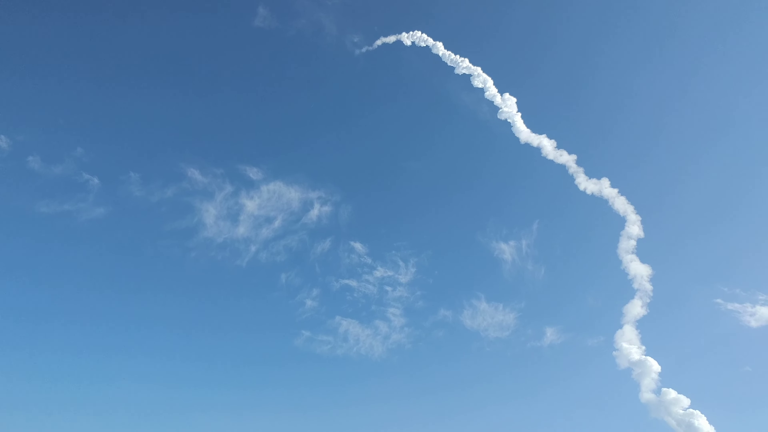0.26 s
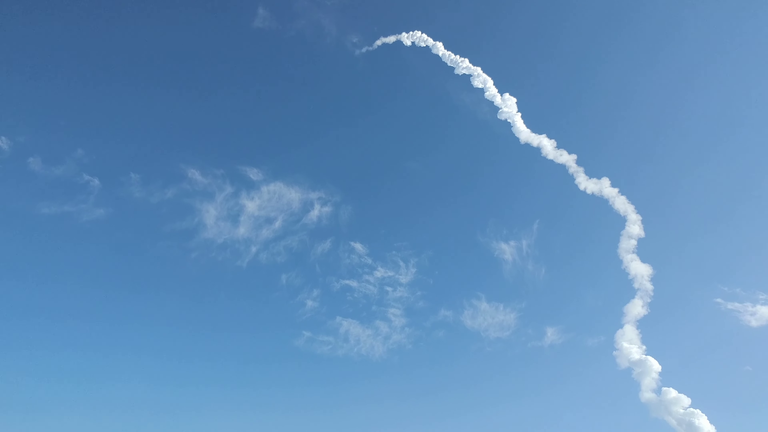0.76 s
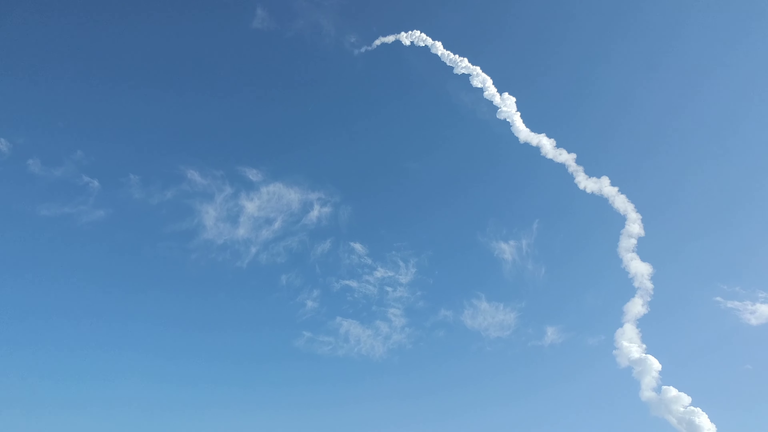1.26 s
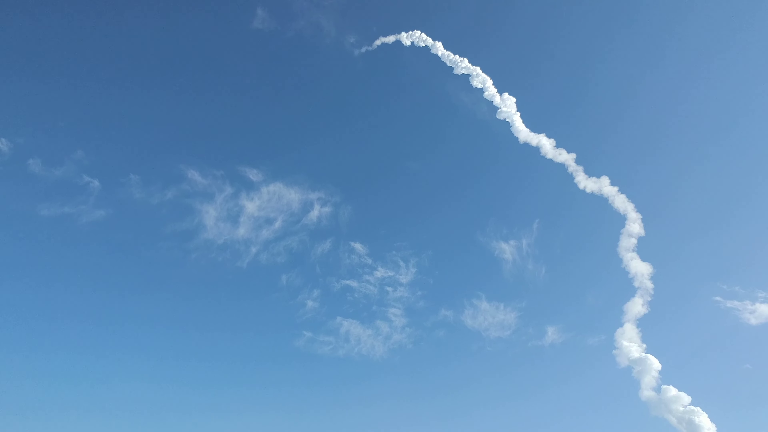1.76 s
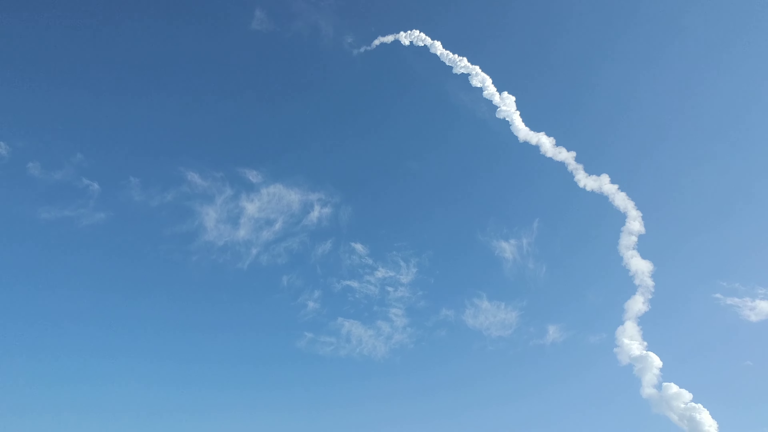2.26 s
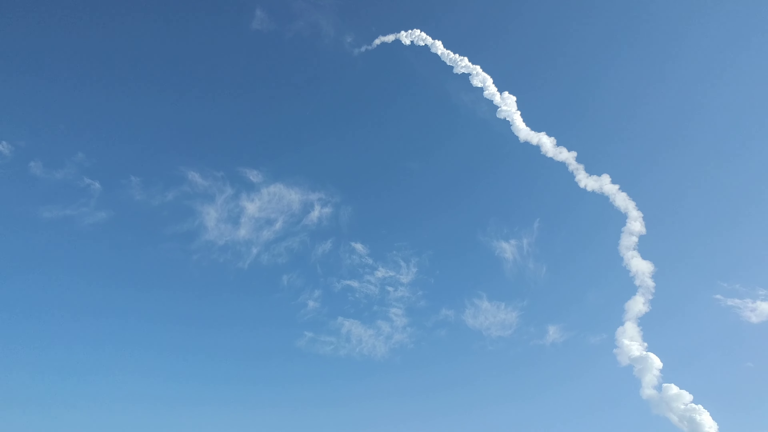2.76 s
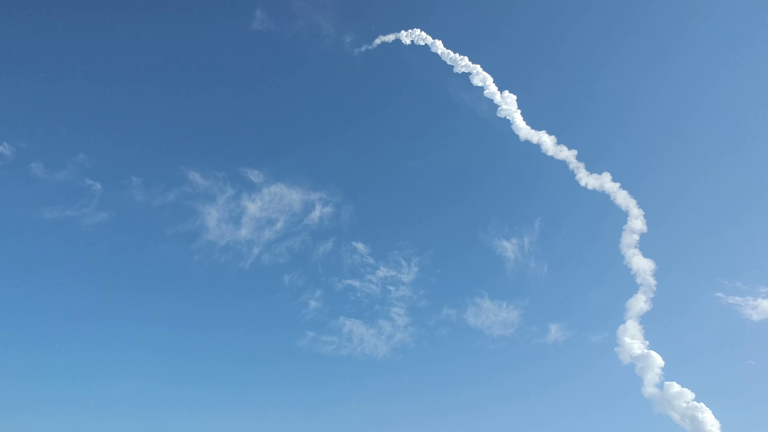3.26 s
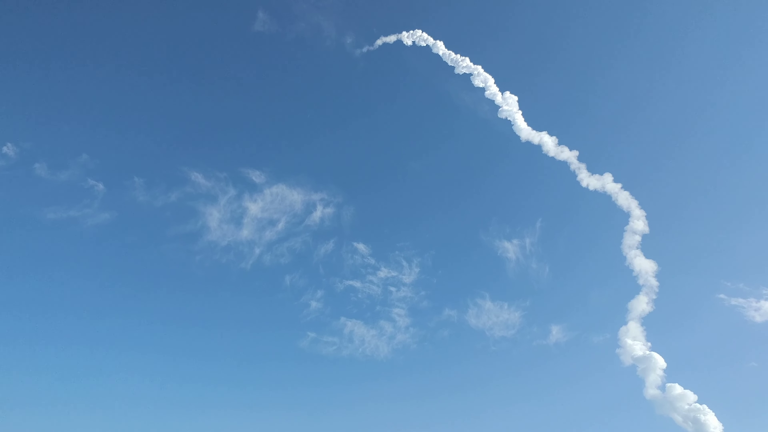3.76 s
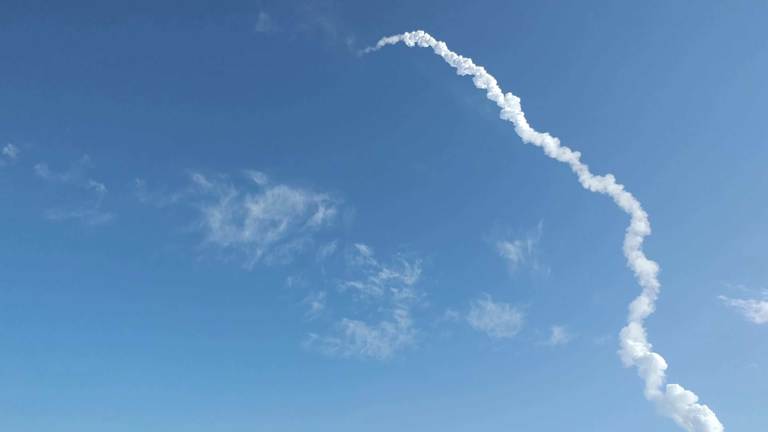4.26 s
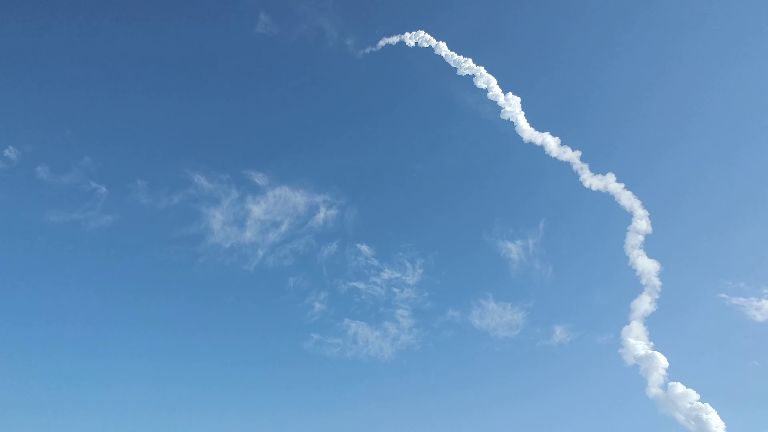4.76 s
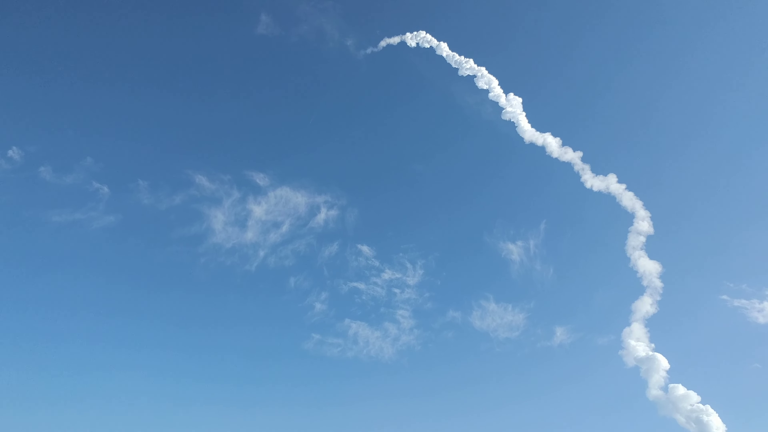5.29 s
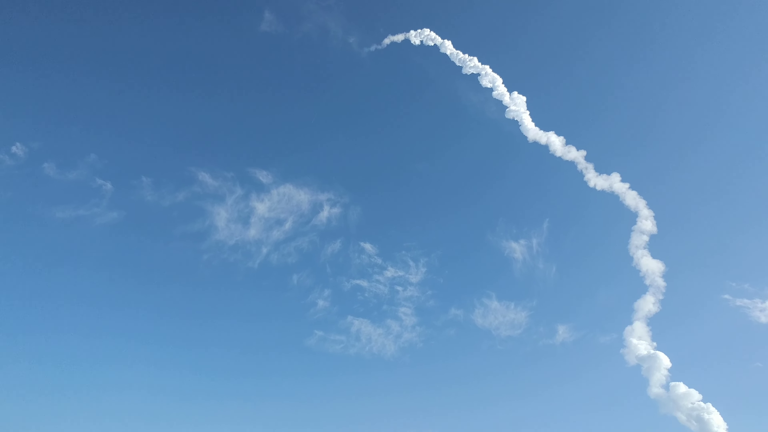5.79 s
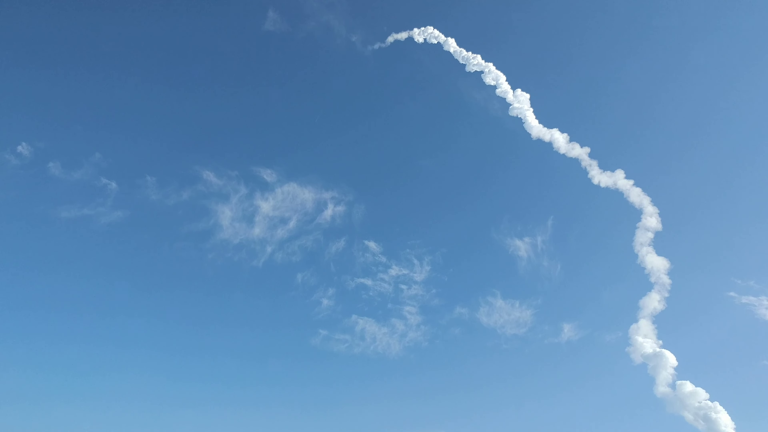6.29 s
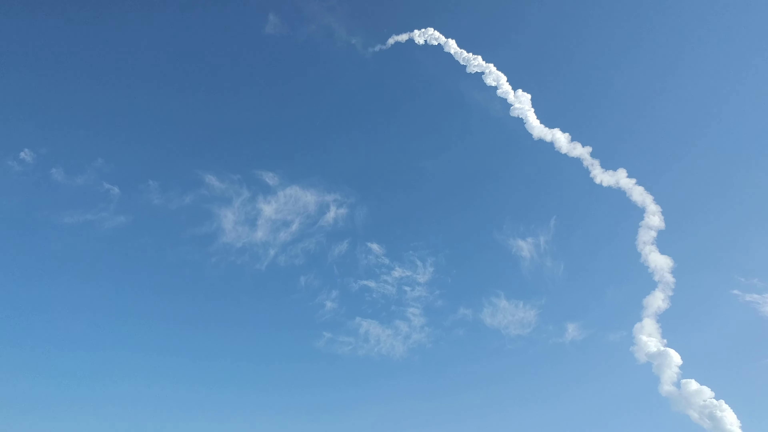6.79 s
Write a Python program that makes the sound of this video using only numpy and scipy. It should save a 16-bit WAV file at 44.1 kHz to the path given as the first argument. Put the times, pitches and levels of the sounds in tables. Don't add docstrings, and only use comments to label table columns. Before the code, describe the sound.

On an open beach, wind buffets a small handheld stereo microphone: deep thumps, fluttering rumble and hard hollow pops, different at left and right. The first three seconds are densest, then it eases around four seconds before fresh gusts return. Far behind, a rocket gives a steady, dull low roar, and faint surf hiss swells softly.

```python
import sys
import numpy as np
from scipy import signal
from scipy.fft import rfft, irfft, next_fast_len
from scipy.io import wavfile
from scipy.ndimage import uniform_filter1d, minimum_filter1d

SR = 44100
rng = np.random.default_rng(int(sys.argv[2]) if len(sys.argv) > 2 else 0)


def volts(x):
    e = np.asarray(x, float) / 20
    return 10 ** e


def to_wav(s):
    ch = np.atleast_2d(s).T
    pcm = np.round(np.clip(ch, -1, 1) * 32767)
    wavfile.write(sys.argv[1], SR, pcm.astype(np.int16))


N = 310464
SIZE = next_fast_len(N)
HZ = np.maximum(np.arange(SIZE // 2 + 1) * SR / SIZE, 1)
TIME = np.arange(N) / SR
TAKE_OVER = 0.76


def at_hz(points):
    hz, value = np.transpose(points)
    return np.interp(np.log(HZ), np.log(hz), value)


def in_time(rows):
    s, *columns = np.transpose(rows)
    return [np.interp(TIME, s, column) for column in columns]


def around(s, reach):
    centre = round(s * SR)
    return np.arange(max(centre - reach, 0), min(centre + reach, N))


def below(hz):
    return 1 / np.sqrt(1 + (HZ / hz) ** 8)


def coloured(spectrum, gain):
    sound = irfft(spectrum * gain, SIZE)[..., :N]
    return sound / np.sqrt(np.mean(sound ** 2, axis=-1, keepdims=True))


def white(lumps_db=0):
    return rfft(rng.standard_normal(N) * volts(lumps_db), SIZE)


def drift(rate_hz):
    return coloured(white(), 1 / (1 + (HZ / rate_hz) ** 2))


def late(ms):
    return np.exp(-2j * np.pi * HZ * np.array([[0], [ms / 1000]]))


def patches(sound, depth_db):
    spectrum = rfft(sound, SIZE)
    place = 3 * np.log2(np.clip(HZ, 1200, 12000) / 1200)
    out = np.zeros_like(sound)
    for k in range(11):
        wander = np.array([drift(rate_hz=1.2), drift(rate_hz=2.0)])
        patch = irfft(spectrum * np.clip(1 - abs(place - k), 0, 1), SIZE)[:, :N]
        out += volts(depth_db * (1 - k / 10) * wander) * patch
    return out


def surf():
    # (time [s], level [dB], lean to the left [dB], coarse spray over the foam [dB])
    near_foam = [(0, -41, 1, 2), (0.4, -43, -3, 1.5), (0.8, -42, 1.5, 5.5), (1.2, -42.5, -1.5, 5.5),
                 (1.5, -40.5, 0.5, 4), (1.81, -37.5, 0.5, 3.5), (2.0, -39.5, -3.5, 3.5), (2.2, -40.5, 4, 3),
                 (2.82, -41.5, 1, 4), (3.05, -39.5, 2.5, 1.5), (3.22, -36, -2, 0.5),
                 (3.6, -37.5, -0.5, 0.5), (4.2, -37, 0.5, 2), (4.83, -35.5, -0.5, -3),
                 (5.3, -37, 0.5, -0.5), (5.7, -39, -0.5, 0), (6.2, -37.5, -1, 0), (7.04, -40, 0, 2.5)]
    # (time [s], level [dB])
    far_wash = [(0, -36), (0.25, -35.8), (0.75, -35.5), (1.25, -36.5), (1.75, -37.5), (2.25, -41),
                (2.85, -41), (3.25, -38), (3.9, -39.5), (4.55, -41), (4.9, -37.5), (5.65, -40.5),
                (5.95, -38.5), (6.35, -38), (6.8, -38.5), (7.04, -37)]
    # (frequency [Hz], likeness [0-1])
    likeness = [(1200, 0.77), (1450, 0.22), (1750, 0.07), (2000, 0.14), (2400, 0.6), (2700, 0.3),
                (3500, 0.02), (3900, 0.77), (5200, 0.01), (6000, 0.12), (7000, 0.12), (9000, 0.01)]
    # (frequency [Hz], level [dB per Hz])
    left_colour = [(1300, -29), (2200, -34), (3000, -40.5), (5000, -39), (7500, -40.5), (8400, -42),
                   (8900, -63), (9200, -46.5), (9800, -37.5), (10500, -31.5), (11300, -35), (12300, -40),
                   (14900, -35), (15200, -68.8)]
    right_colour = [(1300, -24.5), (2200, -31.5), (3000, -38), (4500, -37), (5800, -35.5), (6700, -29.5),
                    (7300, -32), (8000, -41), (8700, -47), (9100, -89.2), (9800, -54), (10500, -51),
                    (12400, -72), (13000, -106)]

    foam_db, lean_db, spray_db = in_time(near_foam)
    wash_db = in_time(far_wash)[0]
    hiss_db = np.array([foam_db + lean_db / 2, foam_db - lean_db / 2])
    alike = np.clip(at_hz(likeness), 0, 1)
    foam = np.array([white(1.2 * drift(rate_hz=7.1)), white(1.0 * drift(rate_hz=18))])
    breaker = white(0.47 * drift(rate_hz=7.2)) * late(ms=0.424)
    waves = np.sqrt(alike) * breaker + np.sqrt(1 - alike) * foam
    waves = waves * volts(np.array([at_hz(left_colour), at_hz(right_colour)])) * below(12640) ** 2

    low = below(2880)
    wash = coloured(waves, low * np.sqrt(1 - below(1140) ** 2))
    hiss = coloured(waves, np.sqrt(1 - low ** 2))
    spray = irfft(rfft(hiss, SIZE) * below(4940), SIZE)[:, :N]
    hiss = hiss + (volts(spray_db) - 1) * spray
    return patches(volts(wash_db - 0.86) * wash + volts(hiss_db - 1.52) * hiss, depth_db=1.6)


def roar():
    # (frequency [Hz], level [dB per Hz])
    roar_colour = [(150, -11), (300, -11), (540, -13), (700, -12.5), (850, -13), (1000, -19.5),
                   (1200, -30.5), (1400, -34.5)]
    source = white(0.8 * drift(rate_hz=6) + 2.0 * drift(rate_hz=80))
    gain = volts(at_hz(roar_colour)) * (1 - below(99)) * below(1900) ** 3
    return volts(-25) * coloured(source * late(ms=0.28), gain)


def puffs(table):
    return sum(over_db * np.exp(-((TIME - s) / half_s) ** 2) for s, over_db, half_s in table)


def gusts():
    # (time [s], strength [dB], lean to the left port [dB])
    wind_course = [(0.0, -10.5, 0.5), (0.59, -12, 2), (1.17, -12.5, 3.5), (1.76, -12.5, -5),
                   (2.35, -14.5, -2), (2.93, -13.5, -5), (3.52, -16.5, -2), (4.11, -16.5, -1.8),
                   (4.69, -14.5, 3), (5.28, -13, -1.5), (5.87, -13.5, -1.5), (6.45, -15, -1.1),
                   (7.04, -11.5, 7.5)]
    # (time [s], level over the wind [dB], half-length [s])
    left_gusts = [(0.06, 3, 0.052), (0.2, -4, 0.057), (0.37, -4, 0.028), (0.47, 5.5, 0.035),
                  (0.585, -8.5, 0.072), (0.737, 2.5, 0.14), (0.95, 2.5, 0.14), (1.166, -5, 0.042),
                  (1.35, -1, 0.075), (1.476, 2, 0.028), (1.75, 3.5, 0.036), (2.066, 3.5, 0.034),
                  (2.265, -3.5, 0.056), (2.55, 2, 0.05), (2.93, 3.5, 0.08), (3.132, -2.5, 0.057),
                  (3.279, -5, 0.02), (3.399, 2.5, 0.047), (3.866, -5.5, 0.11), (4.25, 0.5, 0.05),
                  (4.415, -5, 0.078), (4.531, -1, 0.055), (4.9, 0.5, 0.067), (5.401, 8, 0.067),
                  (5.62, -2, 0.06), (5.9, 0, 0.079), (6.05, 0, 0.019), (6.376, -5.5, 0.051),
                  (6.837, -3.5, 0.06), (6.92, -2, 0.03)]
    right_gusts = [(0.147, -10, 0.05), (0.261, 8, 0.068), (0.372, 4, 0.03), (0.612, 4, 0.05),
                   (0.73, -3, 0.046), (1.002, -1, 0.086), (1.186, 3.5, 0.067), (1.274, 3.5, 0.059),
                   (1.707, -7, 0.094), (1.932, 4.7, 0.041), (2.542, -5, 0.085), (2.739, 0, 0.099),
                   (3.007, 2.5, 0.036), (3.211, -3.5, 0.17), (3.372, 1, 0.041), (3.456, 0.5, 0.048),
                   (3.9, -7, 0.036), (4.048, -14, 0.041), (4.501, 2, 0.034), (4.608, 2.5, 0.058),
                   (5.027, -2.5, 0.17), (5.222, 2, 0.07), (5.707, -2.5, 0.049), (5.828, 5, 0.044),
                   (6.431, 0, 0.059), (6.649, 3.5, 0.045), (6.78, -7, 0.06)]

    wind_db, lean_db = in_time(wind_course)
    port_db = wind_db + np.array([lean_db / 2 + puffs(left_gusts), puffs(right_gusts) - lean_db / 2])
    swing_db = port_db - port_db.mean(axis=1, keepdims=True)
    flutter_db = np.array([-17.5 + 0 * TIME, -38 + 3 * TIME])
    return port_db - 5, flutter_db + 0.86 * swing_db


def build_up(table):
    bursts = np.zeros(SIZE)
    s, peak_db = np.transpose(table)[:2]
    bursts[(s * SR).astype(int)] = volts(np.minimum(peak_db, 1))
    lag = np.fft.fftfreq(SIZE, 1 / SIZE) / SR
    shape = np.where(lag < 0, np.exp(lag / 0.0016), np.exp(-lag / 0.0048))
    shape = shape + 0.54 * np.exp(-(lag / 0.021) ** 2)
    return 1 + 1.8 * irfft(rfft(bursts) * rfft(shape), SIZE)[:N]


def calm(table):
    share = np.ones(N)
    for s, *_ in table:
        i = around(s, reach=600)
        share[i] *= 1 - TAKE_OVER * np.exp(-((TIME[i] - s) / 0.0018) ** 2)
    return share


def eddies(table, cycles):
    out, share = np.zeros(N), np.ones(N)
    turns = rng.uniform(0, 2 * np.pi, len(table))
    for (s, peak_db, hz), turn in zip(table, turns):
        i = around(s, reach=1500)
        t = i / SR - s
        bell = np.exp(-(t * hz / cycles) ** 2)
        out[i] += volts(peak_db) * bell * np.cos(2 * np.pi * hz * t + turn)
        share[i] *= 1 - TAKE_OVER * np.sqrt(bell)
    return out, share


def wind(colour, thud_db, flutter_db, swell, thumps, crackle):
    lumps = drift(rate_hz=9.4)
    thud_lumps_db = np.minimum(1.05 * lumps + 0.96 * drift(rate_hz=57), 1.5)
    flutter_lumps_db = np.minimum(0.9 * lumps + 1.9 * drift(rate_hz=64), 1.5)
    low = below(226)
    gain = volts(at_hz(colour)) * below(1770) ** 3
    thud = coloured(white(thud_lumps_db), gain * low)
    flutter = coloured(white(flutter_lumps_db), gain * np.sqrt(1 - low ** 2))

    thump, thud_left = eddies(thumps, cycles=0.62)
    crack, flutter_left = eddies(crackle, cycles=0.77)
    steady = volts(thud_db + 1.43) * np.sqrt(swell) * thud * thud_left
    steady += volts(flutter_db - 6.5) * swell * flutter * flutter_left
    return steady, volts(-1.6) * thump + volts(-0.74) * crack


def pops(table):
    out = np.zeros(N)
    turns = rng.uniform(0, 2 * np.pi, (len(table), 2))
    for (s, peak_db, hz, push_db), (turn, push_turn) in zip(table, turns):
        i = around(s, reach=600)
        t = i / SR - s
        ring = np.exp(-(t * hz / 0.72) ** 2) * np.cos(2 * np.pi * hz * t + turn)
        push = np.exp(-(t / 0.0024) ** 2) * np.cos(2 * np.pi * 230 * t + push_turn)
        front = np.exp(-(t / 0.00086) ** 2) * np.cos(3.8 * np.pi * hz * t + push_turn)
        ring += 0.16 * (hz / 600) ** 2 * front
        out[i] += volts(min(peak_db + 2.1, -1)) * ring + volts(push_db + 2.5) * push
    return out


def ducking(overloads):
    drops = [np.where(TIME > s, drop_db - 72 * (TIME - s), 0) for s, drop_db in overloads]
    drop = np.max(drops, axis=0).clip(0)
    return volts(-uniform_filter1d(uniform_filter1d(drop, size=100), size=100))


def left_port(thud_db, flutter_db):
    # (frequency [Hz], level [dB per Hz])
    wind_colour = [(22, -21), (35, -18), (50, 4.5), (65, -4.5), (90, 3.5), (130, -2.5), (200, -2),
                   (300, -2.5), (420, -9), (540, -1.5), (700, -17.5), (850, -15.5), (1000, -21.5),
                   (1250, -33.5)]
    # (time [s], peak [dB], cavity pitch [Hz], push [dB])
    pop_table = [(0.1217, -9, 586, -15), (0.1704, -9, 480, -7), (0.3439, 2, 550, -14),
                 (0.3686, -5, 574, -8), (0.3764, 6, 650, -8), (0.3996, 9, 650, -12), (0.4604, -3, 543, -13),
                 (0.4753, -10, 497, -11), (0.7751, -11, 530, -7), (1.1468, 2, 610, -8),
                 (1.1889, -5, 480, -14), (1.2307, -1, 540, -3), (1.4639, -2, 710, -13),
                 (1.6677, 3, 615, -13), (1.813, -6.5, 556, -13), (1.9297, -6.5, 463, -8),
                 (1.9568, -6.5, 700, -7.5), (2.0481, -11, 527, -7), (2.1203, -1, 550, -7),
                 (2.3365, 0, 560, -16), (2.5495, -5, 530, -12), (2.8435, -5.5, 540, -15),
                 (2.9662, -5.5, 590, -23), (4.2922, -4, 497, -16), (4.5944, 6, 457, -19),
                 (5.4225, -5, 730, -12), (5.5509, -7, 600, -29), (5.6669, 5, 555, -15),
                 (6.8317, 1, 550, -25), (6.8592, -8, 500, -5), (0.372, -8, 790, -14),
                 (2.069, -12, 684, -10), (2.11, -8, 720, -19)]
    # (time [s], peak [dB], pitch [Hz])
    thump_table = [(0.024, -3, 140), (0.047, -6.1, 140), (0.076, -4.9, 160), (0.128, -5, 140),
                   (0.18, -5, 90), (0.245, -2, 120), (0.338, -2, 160), (0.371, -7, 150), (0.401, -11, 130),
                   (0.463, -9, 142), (0.487, -3, 90), (0.54, -5, 110), (0.65, 0, 130), (0.679, -8, 100),
                   (0.716, -1, 109), (0.743, -4, 131), (0.763, -5, 170), (0.806, -2, 130),
                   (0.826, -6.7, 130), (0.883, -9, 120), (0.911, -8, 110), (0.965, -13, 100),
                   (1.036, -6.3, 100), (1.068, -6.5, 110), (1.132, -5, 120), (1.229, -9, 139),
                   (1.271, -6.9, 90), (1.328, -8, 89.5), (1.374, -5, 150), (1.464, -3, 90),
                   (1.482, -2.5, 110), (1.569, -4, 100), (1.717, -5.6, 110), (1.908, -0.5, 174),
                   (2.061, 0, 111), (2.116, -10, 122), (2.548, -6, 120), (2.947, -3.5, 150),
                   (4.531, -3.5, 111), (4.804, -7.7, 130), (5.311, -11, 129), (5.414, -1.8, 109),
                   (5.671, -10, 150), (6.051, -0.5, 140), (6.635, -5, 170), (6.761, -4, 120),
                   (6.798, -3, 121), (6.833, -2, 109), (6.862, -5.1, 150), (7.02, -10, 111)]
    # (time [s], peak [dB], cavity pitch [Hz])
    crackle_table = [(0.065, -1, 480), (0.111, -6, 666), (0.247, 5, 473), (0.333, -9, 460),
                     (0.352, -13, 510), (0.384, 6, 470), (0.391, -9, 448), (0.489, -11, 560),
                     (0.55, -6.5, 470), (0.665, -10, 570), (0.712, -3.5, 497), (0.815, -4.5, 457),
                     (0.852, -12, 510), (0.858, -6.9, 480), (0.9, -8, 580), (1.008, -2, 526),
                     (1.065, -4.5, 520), (1.128, -7.5, 656), (1.214, -4, 550), (1.249, -4, 527),
                     (1.342, -3.5, 600), (1.421, -4, 490), (1.455, -4, 560), (1.479, -3.5, 580),
                     (1.506, -5, 516), (1.675, -0.5, 530), (1.742, -4, 450), (1.763, -6, 610),
                     (1.823, -3, 573), (1.862, -6.7, 560), (1.963, -3.5, 554), (2.041, -2, 514),
                     (2.718, -6.5, 670), (2.879, -4, 540), (2.909, -4.4, 566), (2.943, -5, 493),
                     (2.98, -12, 510), (3.022, -5.5, 540), (3.057, -4, 580), (3.405, -5.5, 480),
                     (4.222, -5.7, 630), (4.234, -5.6, 625), (4.739, -5.5, 490), (4.944, -5, 500),
                     (5.093, -8, 550), (5.353, -5, 556), (5.402, -13, 530), (5.409, -3.5, 510),
                     (5.523, -4.9, 526), (5.567, -1, 533), (5.573, -3, 580), (5.629, -4.5, 440),
                     (5.946, -7, 590), (5.955, -7, 560), (6.667, -5, 570), (6.978, -4, 480),
                     (6.996, -3, 580), (7.032, -1.5, 560)]
    # (time [s], gain drop [dB])
    overload_table = [(0.268, 2.5), (0.342, 3), (0.398, 6.5), (1.07, 4.5), (1.14, 4), (1.666, 4), (2.12, 9),
                      (5.422, 7), (5.667, 2.5), (6.832, 2.5), (6.859, 6.5)]
    steady, strong = wind(wind_colour, thud_db, flutter_db, build_up(pop_table), thump_table, crackle_table)
    return calm(pop_table) * steady, strong + pops(pop_table), ducking(overload_table)


def right_port(thud_db, flutter_db):
    # (frequency [Hz], level [dB per Hz])
    wind_colour = [(22, -18), (35, -40), (50, 6), (65, 6.5), (90, 2), (130, 1), (200, -5), (300, -10.5),
                   (420, -12), (540, -12.5), (700, -14.5), (850, -14), (1000, -17.5), (1250, -32)]
    # (time [s], peak [dB], cavity pitch [Hz], push [dB])
    pop_table = [(0.0311, -12, 470, -7), (0.3862, -2, 540, -6), (0.4171, -13, 480, -9),
                 (0.5916, -13, 473, -8.5), (1.2041, 18, 576, -13), (2.0407, -14, 440, -14),
                 (2.0515, -6, 490, -7), (2.343, -7.5, 567, -22), (2.366, -4, 544, -14),
                 (2.4702, -13, 450, -9), (2.7204, -6, 480, -4), (2.9906, -12, 490, -17),
                 (3.0071, -11, 660, -10), (3.0525, -11, 500, -23), (3.1752, -8, 510, -27),
                 (4.5084, -2.5, 580, -13), (4.5975, -7, 475, -24), (4.9201, -10, 500, -13),
                 (5.3135, -10, 470, -16), (5.353, -14, 470, -15), (5.5872, -4, 527, -15),
                 (5.6889, -10, 556, -11), (5.82, -22, 570, -18), (6.4698, -10, 550, -24),
                 (6.5417, -22, 450, -21), (6.6514, -16, 580, -15), (6.7526, -8, 530, -10),
                 (6.7888, -13, 670, -12)]
    # (time [s], peak [dB], pitch [Hz])
    thump_table = [(0.04, -2, 89), (0.062, -10, 90), (0.227, 0, 110), (0.273, -1.7, 80), (0.3, -9, 90),
                   (0.34, -2, 90), (0.375, -0.5, 120), (0.421, -9, 120), (0.568, -6, 91), (0.593, -6, 101),
                   (0.621, -2, 70), (0.808, -6.8, 120), (1.14, -5.2, 110), (1.201, 2, 110),
                   (1.829, -2, 89.5), (1.852, -4.5, 110), (1.91, -2, 99), (1.933, 2, 69.6),
                   (2.041, -0.5, 90), (2.062, -3, 80), (2.172, 0, 91), (2.254, 0, 79.4), (2.371, -1, 98),
                   (2.471, -3, 90), (2.638, -3, 89), (2.699, -1.5, 88), (2.729, 0, 80), (2.764, 2, 112),
                   (2.791, -6.6, 80), (3.002, -2, 90), (4.509, -3.5, 88.5), (4.615, -10, 90),
                   (5.187, -3, 109), (5.23, -4, 99), (5.33, -6.7, 129), (5.355, -6, 100), (5.59, -2.5, 120),
                   (5.623, -5.7, 110), (5.71, -1.4, 101), (5.809, -5, 80), (5.845, -5, 108),
                   (6.546, 1, 115), (6.652, -3, 90), (6.704, -5, 120), (6.754, 1, 99), (6.796, 2, 140),
                   (6.862, -2, 142), (6.922, -7.5, 90), (7.004, -4, 111), (7.03, -4, 90)]
    # (time [s], peak [dB], cavity pitch [Hz])
    crackle_table = [(0.016, -11.8, 450), (0.038, -10.7, 510), (0.252, -9, 570), (0.348, -14, 520),
                     (0.41, -16, 510), (1.195, -8, 560), (2.281, -13, 480), (2.765, -9, 500),
                     (2.997, -20, 610), (3.168, -13.3, 490), (3.305, -6, 553), (3.639, -10, 570),
                     (4.097, -12, 540), (4.233, -15, 620), (4.251, -11, 550), (4.292, -17, 560),
                     (4.337, -11, 480), (4.624, -12.7, 590), (4.772, -8, 510), (4.857, -9, 520),
                     (4.931, -7, 450), (4.939, -6, 630), (4.946, -11.5, 470), (4.961, -6, 554),
                     (5.185, -11, 490), (5.281, -5.5, 520), (5.291, -8, 570), (5.329, -8, 460),
                     (5.345, -10, 520), (5.363, -11, 510), (5.402, -12.9, 610), (5.492, -13.5, 700),
                     (5.554, -7, 604), (5.624, -7, 500), (5.649, -10, 680), (5.705, -17, 510),
                     (5.739, -16, 460), (5.759, -12.4, 670), (5.829, -19, 650), (5.86, -13.3, 650),
                     (5.965, -13.5, 490), (6.037, -12.6, 560), (6.081, -13, 460), (6.152, -11, 550),
                     (6.204, -11, 720), (6.242, -11.8, 620), (6.52, -11, 650), (6.558, -19, 520),
                     (6.566, -12.7, 670), (6.583, -13.0, 750), (6.604, -15, 640), (6.613, -13.3, 630),
                     (6.625, -11, 510), (6.695, -13.5, 590), (6.71, -11, 640), (6.716, -12.8, 640),
                     (6.796, -17, 580), (7.034, -14, 630)]
    # (time [s], gain drop [dB])
    overload_table = [
        (0.27, 2.9),
        (1.204, 9.2),
        (2.04, 3),
        (2.052, 8.5),
        (2.168, 6),
        (2.366, 8.5),
        (4.508, 6.3),
    ]
    steady, strong = wind(wind_colour, thud_db, flutter_db, build_up(pop_table), thump_table, crackle_table)
    return calm(pop_table) * steady, strong + pops(pop_table), ducking(overload_table)


def scene():
    far = surf() + roar()
    thud_db, flutter_db = gusts()
    left_wind, left_bursts, left_gain = left_port(thud_db[0], flutter_db[0])
    right_wind, right_bursts, right_gain = right_port(thud_db[1], flutter_db[1])
    gain = np.array([left_gain, right_gain])
    return gain * (np.array([left_wind, right_wind]) + far) + np.array([left_bursts, right_bursts])


def band_limit(x):
    return signal.sosfilt(signal.butter(12, 15570, fs=SR, output="sos"), x)


def record(dry):
    ceiling, look_ahead = 0.93, 96
    dry = signal.sosfilt(signal.butter(2, 33, "high", fs=SR, output="sos"), dry)
    peak = -minimum_filter1d(-np.abs(dry), size=2 * look_ahead + 1)
    gain = np.minimum(1, ceiling / (peak + 1e-9))
    gain = uniform_filter1d(uniform_filter1d(gain, size=look_ahead), size=look_ahead)
    return band_limit(dry * gain)


dry = scene()
out = record(dry)
to_wav(out)
```